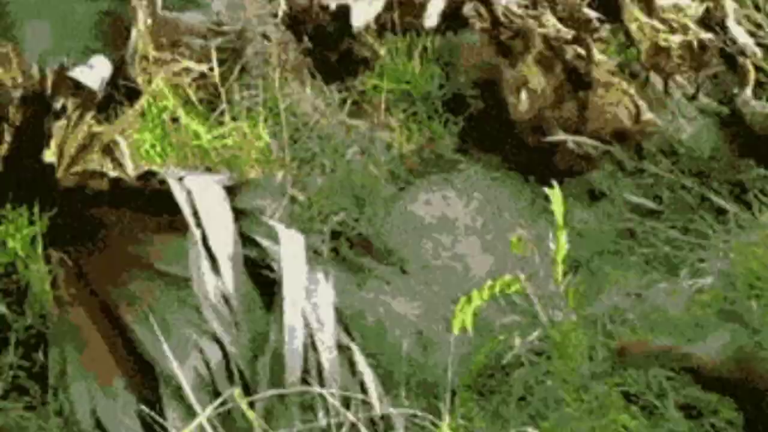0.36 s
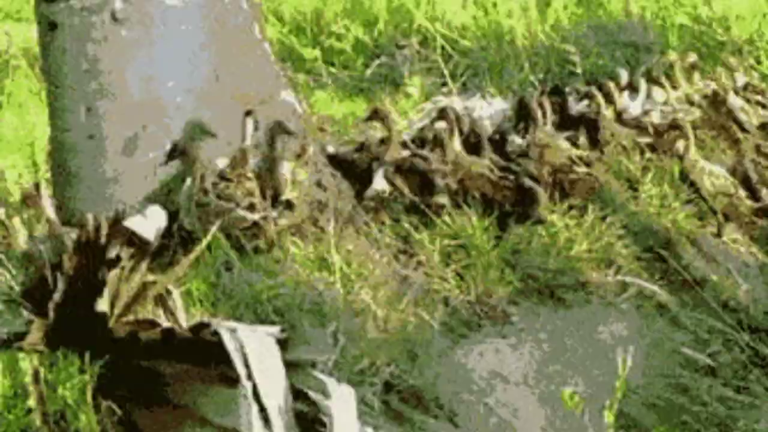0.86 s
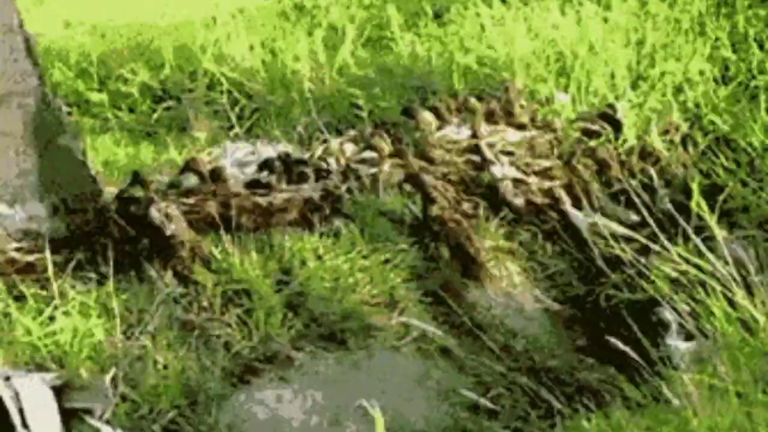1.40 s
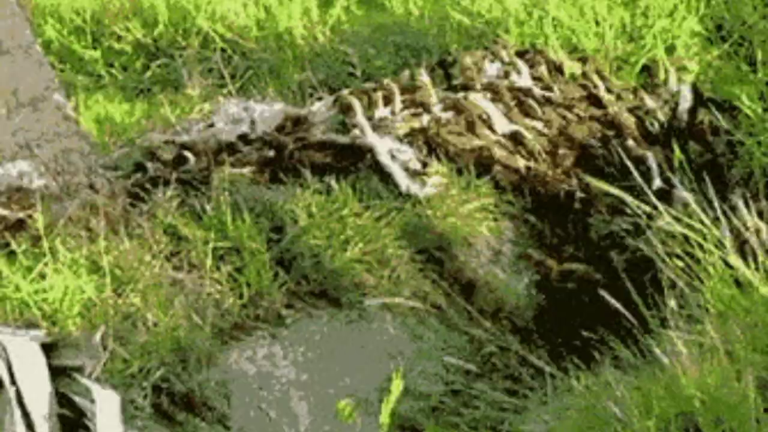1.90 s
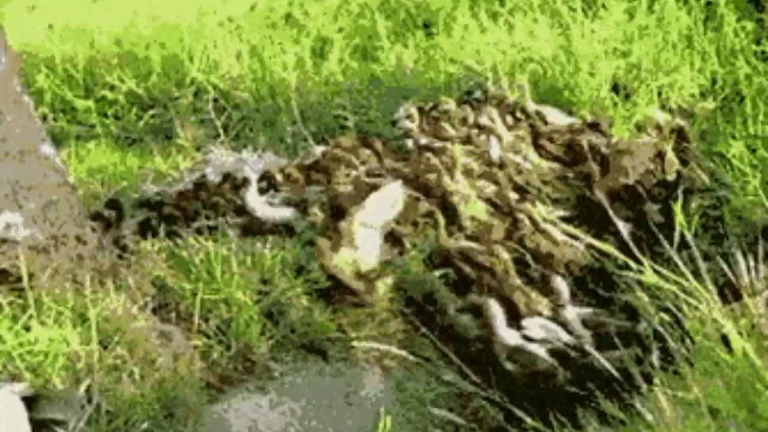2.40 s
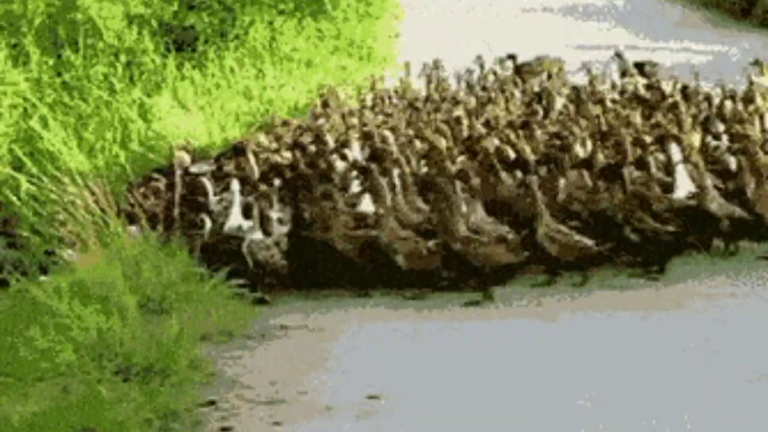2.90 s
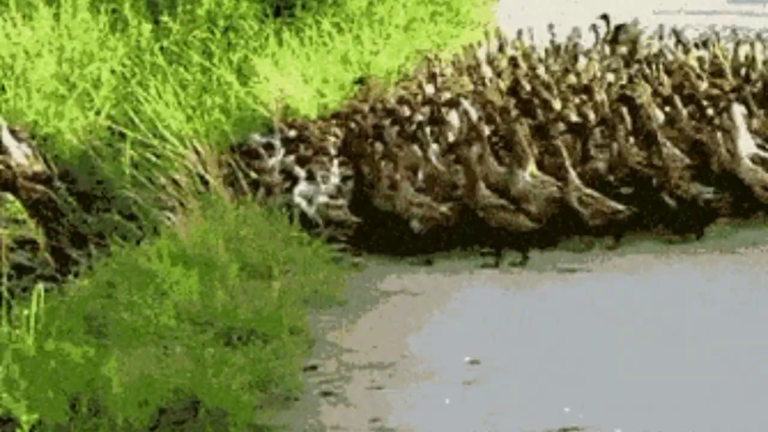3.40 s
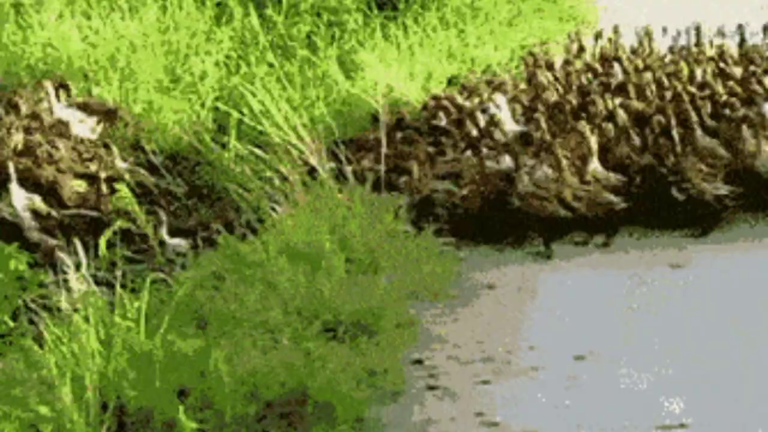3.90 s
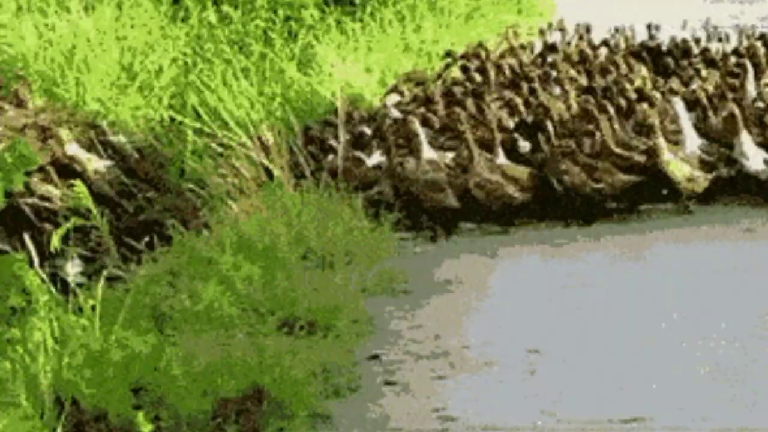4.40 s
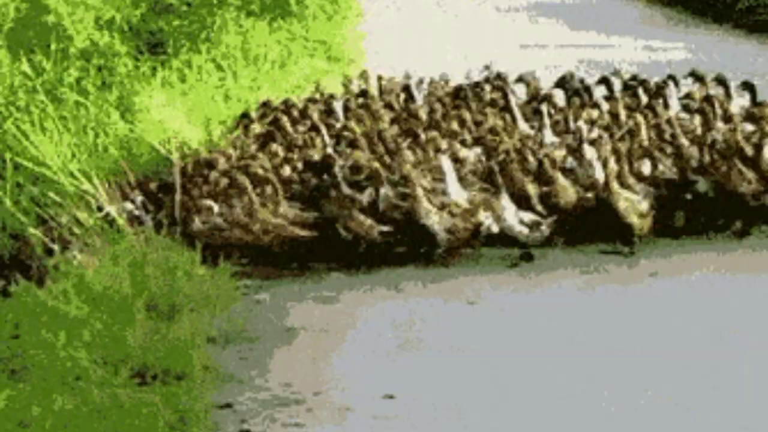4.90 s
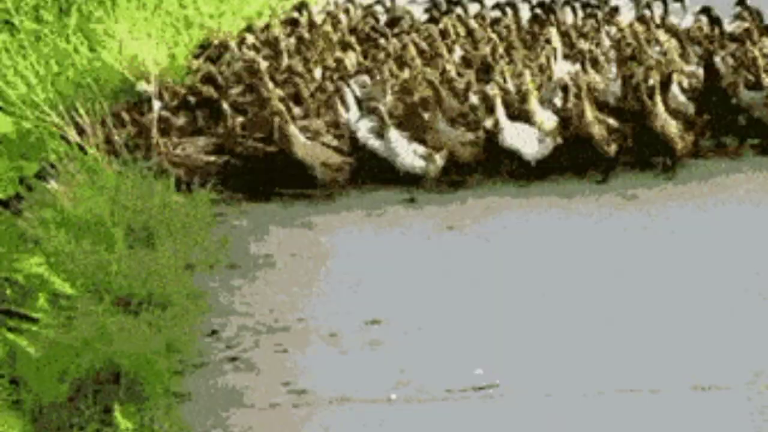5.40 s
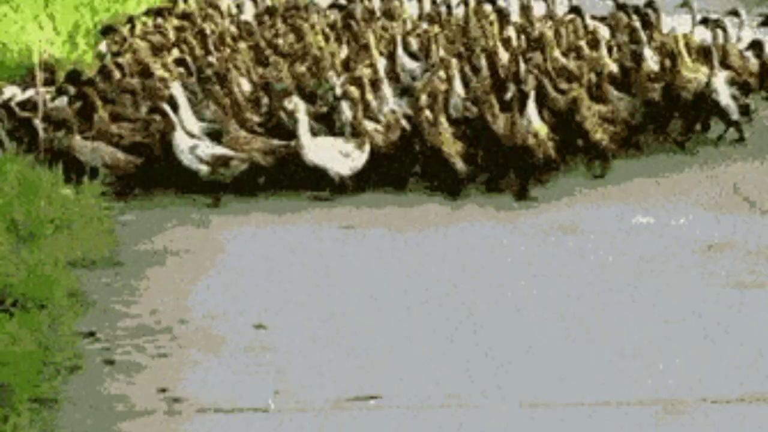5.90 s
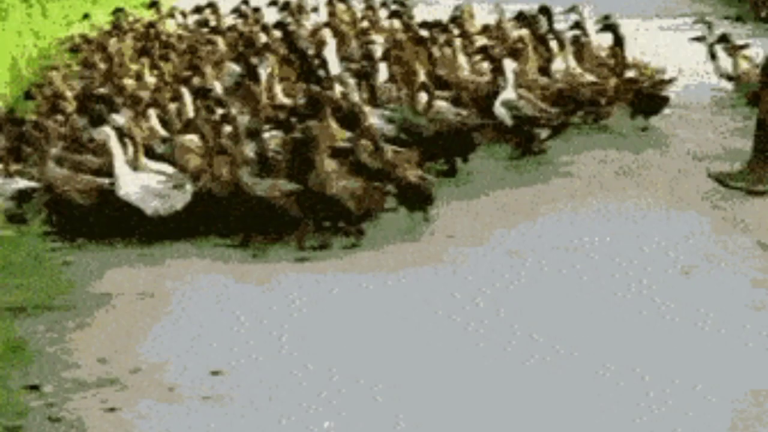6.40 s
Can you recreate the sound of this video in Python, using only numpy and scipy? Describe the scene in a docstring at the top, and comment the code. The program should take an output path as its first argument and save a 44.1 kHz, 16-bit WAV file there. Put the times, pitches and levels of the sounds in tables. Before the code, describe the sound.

Nasal hen quacks and short creaking clucks come ever closer together, with raspy drakes, small snaps and thin peeps in a quiet field.

```python
"""A duck quacks at once, close by on a grassy roadside, over a quiet field hum.
Hens quack with nasal, buzzing pulses that ring bill and windpipe, and end on short, creaking clucks.
Drakes rasp in between with throbbing, hoarse air; bills snap shut with small knocks, and thin tones peep.
A rustle of shaped noise hisses now and then; a short burst of mostly low, rumbling noise comes at the end."""
import sys
import numpy as np
from scipy import signal
from scipy.fft import rfft, irfft
from scipy.io import wavfile
from scipy.ndimage import uniform_filter1d

SR = 44100
rng = np.random.default_rng(int(sys.argv[2]) if len(sys.argv) > 2 else 0)


def volts_from_decibels(level):
    """Turn decibel levels (scalar or array-like) into linear amplitude factors."""
    exponent = np.asarray(level, float) / 20
    return 10 ** exponent


def dump(signal):
    """Clip the signal to [-1, 1] and save it as 16-bit WAV at the path in sys.argv[1]."""
    limited = np.clip(np.atleast_2d(signal).T, -1, 1)
    pcm = np.round(limited * 32767).astype(np.int16)
    wavfile.write(sys.argv[1], SR, pcm)


N = 287532  # length of the scene in samples

# Hen's windpipe and upper throat. Each row: resonance in Hz, width setting in Hz, gain in dB.
# A quack sets its own gain for the first row.
HEN_TUBE = [(667, 423, -19.5), (2062, 178, -10.5)]
# Treble resonances of a hen's voice. Each row: resonance in Hz, width setting in Hz, gain in dB.
HEN_TREBLE = [(3534, 1050, 2.5), (4660, 1400, -3.5), (6680, 1910, -13)]


def evened(x):
    """Scales to an average (rms) level of 1."""
    return x / np.sqrt(np.mean(x ** 2) + 1e-20)


def steady(x, size=1300):
    """Evens out the slow level over size samples, so that effort alone shapes the call."""
    return x / np.sqrt(uniform_filter1d(x ** 2, size) + 1e-12)


def wobble(n, size):
    """Smooth random drift of rms 1; a larger size in samples drifts more slowly."""
    smooth = uniform_filter1d(rng.standard_normal(n), size)
    return evened(uniform_filter1d(smooth, size))


def noise(colour, n):
    """Noise of rms 1 whose spectrum follows the colour table."""
    table_hz, table_db = np.transpose(colour)
    hz = np.fft.rfftfreq(n, 1 / SR)
    shape = volts_from_decibels(np.interp(np.log(hz + 1), np.log(table_hz), table_db))
    return evened(irfft(rfft(rng.standard_normal(n)) * shape, n))


def add(mix, s, sound):
    """Mixes a sound in from s seconds on."""
    part = mix[round(s * SR):][:len(sound)]
    part += sound[:len(part)]


def spread(rows):
    """Gives the start time and the columns of a curve, sample by sample."""
    s, *columns = np.transpose(rows)
    t = np.arange(s[0], s[-1], 1 / SR)
    return s[0], [np.interp(t, s, column) for column in columns]


def resonate(x, hz, width):
    """A steep resonance: shifts the curve hz down to zero, smooths twice, and shifts back."""
    turn = np.exp(2j * np.pi * np.cumsum(hz * np.ones(len(x))) / SR)
    r = np.exp(-np.pi * width / SR)
    once = signal.lfilter([1 - r], [1, -r], x / turn + 1e-18)
    twice = signal.lfilter([1 - r], [1, -r], once)
    return 2 * (turn * twice).real


def body(x, modes):
    """Sums fixed resonances, every other one upside down."""
    return sum((-1) ** k * volts_from_decibels(db) * resonate(x, hz, width) for k, (hz, width, db) in enumerate(modes))


def ground(x, t60):
    """Short scatter off grass, road and birds: sparse echoes of random sign, down 60 dB after t60 s."""
    at = np.arange(120, 9000, 22)
    taps = np.zeros(9100)
    signs = rng.choice([-1., 1.], len(at))
    taps[at + rng.integers(0, 22, len(at))] = signs * volts_from_decibels(-60 * at / SR / t60)
    return signal.fftconvolve(x, taps / np.linalg.norm(taps))[:N]


def hiss():
    """Microphone hiss: steady noise."""
    # The tint of the hiss. Each row: frequency in Hz, relative level in dB per Hz.
    hiss_colour = [(2000, -18.5), (5000, -3.5), (8400, 2), (12000, -4.5), (15500, -6.5)]
    return volts_from_decibels(-92.5) * noise(hiss_colour, N)


def field():
    """Low outdoor hum, made of noise, that swells with the stir of the flock."""
    # The tint of the hum. Each row: frequency in Hz, relative level in dB per Hz.
    field_colour = [(12, -20.5), (20, -18), (122, 1.5), (170, -6.5), (361, -10.5), (1230, -17),
                    (5220, -26.5), (8150, -38.5), (15400, -69)]
    # How the hum swells. Each row: time in seconds, change of level in dB.
    field_swell = [(0, 4), (2.798, 4), (3.2, 12.5), (4.399, 7), (5.8, 11), (6.25, -1.5), (6.32, -6),
                   (6.52, -15.5)]
    s, swell_db = np.transpose(field_swell)
    level_db = -79 + np.interp(np.arange(N) / SR, s, swell_db) + 1.5 * wobble(N, size=900)
    return volts_from_decibels(level_db) * noise(field_colour, N)


def burst(rows, colour):
    """Coloured noise on a level curve, with a light flicker."""
    s, (db,) = spread(rows)
    n = len(db)
    level = volts_from_decibels(db + 0.76 * wobble(n, size=150))
    return s, level * noise(colour, n) * signal.windows.tukey(n, .1)


def add_end_rumble(mix):
    """A short burst of mostly low, rumbling noise at the end."""
    # The course of the rumble. Each row: time in seconds, level in dB.
    rumble_curve = [(6.425, -59), (6.455, -47), (6.52, -58.5)]
    # The tint of the rumble. Each row: frequency in Hz, relative level in dB per Hz.
    rumble_colour = [(12, -27), (20, 6), (393, -22), (685, -16.5), (1410, -22), (1720, -11), (3740, -31.5),
                     (5830, -32.5), (13800, -44.5), (15400, -59.5)]
    add(mix, *burst(rumble_curve, rumble_colour))


def add_rustles(mix):
    """Rustles: bursts of hissing noise that rise and fall."""
    # The rustles. Each row: start in seconds, rise in seconds, fall in seconds, top level in dB.
    rustle_rows = [(0.25, 0.046, .11, -57), (0.63, 0.057, 0.093, -80.5), (3.24, .032, 0.18, -55),
                   (5.72, .11, .07, -70)]
    # The tint of a rustle. Each row: frequency in Hz, relative level in dB per Hz.
    rustle_colour = [(2350, -29.5), (4000, -2.5), (8200, -2), (8780, 0.5), (9500, -18), (11800, 2.5),
                     (15400, 4)]
    for s, rise, fall, db in rustle_rows:
        rest_db = db - 26.5
        curve = [(s, rest_db), (s + rise, db), (s + rise + fall, rest_db)]
        add(mix, *burst(curve, rustle_colour))


def snap(s, level_db, ring_hz, thump_db):
    """A blunt ringing knock with a thin noise crack, a short scuffle after it and a low push."""
    t = np.arange(1500) / SR
    knock = np.sin(2 * np.pi * ring_hz * t) * np.exp(-t / 0.0019)
    crack_and_scuffle = 0.19 * np.exp(-t / 0.0027) + 0.048 * np.exp(-t / 0.014)
    crack = rng.standard_normal(1500) * crack_and_scuffle
    crack = signal.lfilter(*signal.butter(3, 4500, fs=SR), crack)
    thump = 3 * volts_from_decibels(thump_db) * (1 - np.exp(-t / 0.0002)) * np.exp(-t / 0.0032)
    return s, volts_from_decibels(level_db) * (knock + crack) + thump


def add_snaps(mix):
    """Bill snaps and foot slaps, each a short knock."""
    # The knocks. Each row: start in seconds, level of knock and crack in dB, ring in Hz,
    # thump setting in dB (before it is tripled).
    snap_rows = [(0.645, -48, 670, -73), (0.652, -37, 563, -72), (1.488, -60, 857, -72),
                 (1.698, -55, 990, -70), (1.758, -38, 1114, -75), (2.324, -34, 872, -58),
                 (2.485, -49, 397, -82.5), (2.856, -36.5, 950, -75.5), (3.317, -39.5, 1044, -67.5),
                 (3.625, -42.5, 314, -78), (3.986, -42, 1110, -65), (4.284, -35, 520, -62.5),
                 (4.363, -41, 828, -61.5), (5.072, -66.5, 1074, -74), (5.371, -33, 910, -73),
                 (5.855, -35.5, 605, -65), (6.137, -31.5, 1220, -72), (6.339, -71, 857, -79.5)]
    for row in snap_rows:
        add(mix, *snap(*row))


def whistle(s, length, from_hz, to_hz, from_db, to_db):
    """A thin gliding tone that flutters a little."""
    n = round(length * SR)
    hz, db = np.linspace([from_hz, from_db], [to_hz, to_db], n).T
    angle = 2 * np.pi * np.cumsum(hz * (1 + 0.0036 * wobble(n, size=100))) / SR
    return s, volts_from_decibels(db) * np.sqrt(2) * np.sin(angle) * signal.windows.tukey(n, .3)


def add_whistles(mix):
    """Thin peeps, most leading into or out of a quack."""
    # The peeps. Each row: start in seconds, length in seconds, first pitch in Hz, last pitch in Hz,
    # first level in dB, last level in dB.
    whistle_rows = [(0.0, 0.029, 1493, 1380, -47, -50), (0.287, 0.057, 1235, 1330, -63, -60.5),
                    (0.73, 0.036, 804, 804, -54.5, -40), (2.959, 0.054, 1276, 1380, -46.5, -40.5),
                    (2.968, 0.064, 880, 846, -49, -46), (3.266, 0.075, 1490, 1507, -65.5, -58),
                    (3.675, 0.03, 1630, 1510, -36, -61.5), (4.634, .035, 857, 820, -48.5, -30),
                    (5.719, 0.069, 1380, 1307, -49, -80), (5.902, .03, 1544, 1705, -37, -36.5),
                    (5.926, 0.037, 912, 940, -31.5, -37)]
    for row in whistle_rows:
        add(mix, *whistle(*row))


def rasp_effort(first_db, swell, top_db, hold):
    """Effort of a rasp in dB: swell, hold, even fade."""
    tail_s, fade_db_per_s = .085, 519.5
    ends = np.cumsum([0, swell, hold, tail_s])
    levels = [first_db, top_db, top_db, top_db - fade_db_per_s * tail_s]
    return np.interp(np.arange(0, ends[-1], 1 / SR), ends, levels)


def rasp(s, first_db, swell, top_db, hold, rate, bright_db, depth):
    """Hoarse air in slow throbs; within each throb the ring climbs and the treble comes last."""
    # drake's treble resonances. Each row: resonance in Hz, width setting in Hz, gain in dB.
    drake_treble = [(2270, 400, 5), (2950, 1800, 7.5), (4620, 970, 6.5), (5550, 930, -7)]
    effort_db = rasp_effort(first_db, swell, top_db, hold)
    n, depth = len(effort_db), np.clip(depth, 0, 1)
    # the bill opens with effort by 26.6 Hz per dB; its starting ring is held to at least 1380 Hz,
    # before the sinking and throbbing
    bill_hz = np.maximum(1697 + 26.6 * (effort_db + 41), 1380)
    bill_hz *= 1 - 0.53 * np.arange(n) / SR  # then the ring sinks through the rasp
    phase = (np.cumsum(rate * (1 + 0.067 * wobble(n, size=400))) / SR) % 1
    throb = 1 - depth + depth * np.exp(-((phase - .45) / .2) ** 2)
    late_throb = 1 - depth + depth * np.exp(-((phase - .57) / .15) ** 2)
    breath = rng.standard_normal(n)
    climb_hz = bill_hz * (1 + 0.19 * np.sin(2 * np.pi * (phase - .45)))
    ring = throb * (resonate(breath, climb_hz, 360) + 0.16 * resonate(breath, 1290, 180))
    dulled_db = bright_db + 0.98 * (effort_db - effort_db.max())  # softer is duller
    treble = volts_from_decibels(dulled_db) * steady(late_throb * body(breath, drake_treble))
    return s, volts_from_decibels(effort_db) * (steady(ring) + treble) * signal.windows.tukey(n, .05)


def add_rasps(mix):
    """Drakes rasp hoarsely, one row of each table a rasp."""
    # The course of each rasp. Each row: start in seconds, first breath in dB, swell in seconds,
    # top effort in dB, hold in seconds.
    rasp_rows = [(0.412, -44, 0.051, -38, 0.014), (1.1, -51, 0.044, -37, 0.037),
                 (1.759, -59.5, 0.039, -43.5, .04), (2.067, -47, 0.028, -44, 0.026),
                 (2.324, -51, 0.017, -42.5, 0.039), (2.528, -49, 0.063, -39.5, 0.011),
                 (2.857, -49, 0.034, -44, 0.021), (3.91, -51, 0.031, -40, 0.022),
                 (4.361, -74.5, .22, -51.5, .05), (4.928, -43, .02, -44, 0.058),
                 (5.362, -43.5, 0.022, -43.5, 0.06), (6.134, -49.5, 0.055, -45, 0.018)]
    # The voice of each rasp. Each row: throbs per second, brightness at full effort in dB,
    # depth of the throb from 0 to 1.
    drake_voices = [(73.2, -12, 0.7), (78.1, -11, 0.69), (65.1, -20, 0.6), (66.2, -21, 0.7),
                    (69.2, -13, 0.59), (70.2, -12.5, 0.68), (71.9, -25.5, 0.3), (73.4, -23.5, 0.5),
                    (60.03, -30.5, 0), (64.8, -19.5, 0.72), (72.6, -15.5, 0.75), (64.8, -18, 0.7)]
    for row, drake in zip(rasp_rows, drake_voices):
        add(mix, *rasp(*row, *drake))


def cluck_effort(peak_db, rise, drop_db, fade):
    """Effort of a cluck in dB: a short rise, a sudden drop, then an even fade."""
    rise_db, drop_s, tail_s = 15.5, 0.0079, 0.078
    t = np.arange(-rise, tail_s, 1 / SR)
    after = np.maximum(t, 0)
    rising_db = peak_db + rise_db * np.minimum(t, 0) / rise
    return rising_db - abs(drop_db) * (1 - np.exp(-after / drop_s)) - abs(fade) * after


def cluck(s, peak_db, rise, drop_db, fade, bill_hz):
    """A few slow, uneven pulses as the voice creaks shut; one falls at full effort."""
    effort_db = cluck_effort(peak_db, rise, drop_db, fade)
    n = len(effort_db)
    chest_db = -42.5 - 0.67 * effort_db  # a weak voice has a greater share of chest
    turns = np.cumsum(155 * (1 + .15 * wobble(n, size=200))) / SR  # about 155 pulses per second
    turns += 20 - turns[np.argmax(effort_db)]  # lines a pulse up with the loudest moment
    whole_turns = np.floor(turns)
    strength = volts_from_decibels(5.2 * rng.standard_normal(60)[turns.astype(int)])
    pulses = abs(np.diff(whole_turns, prepend=whole_turns[0])) * strength
    breath = rng.standard_normal(n)
    blunt = signal.lfilter(*signal.butter(2, 2600, fs=SR), evened(pulses) + .4 * breath)
    drive = evened(blunt)
    sinking_hz = bill_hz * (1 - 1.1 * np.arange(n) / SR)  # the ring sinks as the bill closes
    voice = resonate(drive, sinking_hz, 480) - body(drive, HEN_TUBE)
    treble_db = -23 + 0.13 * (effort_db - effort_db.max())
    treble = volts_from_decibels(treble_db) * steady(body(0.23 * drive + breath, HEN_TREBLE), size=700)
    chest = volts_from_decibels(chest_db) * steady(resonate(drive, 230, 150), size=700)
    sound = volts_from_decibels(effort_db) * (steady(voice, size=700) + treble + chest)
    return s - rise, sound * signal.windows.tukey(n, .1)


def add_clucks(mix):
    """Short clucks of the hens."""
    # The clucks. Each row: loudest moment in seconds, peak effort in dB, rise in seconds,
    # first drop in dB (sign ignored), fade in dB per second, bill resonance at the start in Hz.
    cluck_rows = [(0.24, -29, 0.034, 1, 443, 1420), (0.36, -35, 0.015, 4.5, 379, 1270),
                  (0.679, -45.5, 0.0083, 13, 62.5, 1136), (1.018, -31.5, 0.019, -3, 525, 1350),
                  (1.7, -49, 0.0052, 4, 530, 1100), (2.038, -28, .03, 9, 350.5, 1320),
                  (3.189, -33, 0.023, 3, 479, 1140), (3.241, -42.5, 0.0076, 8, 252, 1170),
                  (3.499, -24.5, 0.037, 0.5, 440, 1460), (3.629, -52.5, 0.011, 1, 60, 1266),
                  (3.858, -34.5, 0.021, 7.5, 527, 1320), (4.209, -28.5, .02, 6, 620, 1356),
                  (4.288, -55, .008, 14, 162, 1170), (4.597, -48.5, .015, -3, 596, 1300),
                  (4.898, -24.5, .025, 15.5, 218, 1383), (5.076, -47.5, 0.0046, 14.5, 80.5, 1180),
                  (5.323, -34.5, .04, 20, 300, 1170), (5.446, -43.5, 0.013, 11.5, 119, 1330),
                  (5.708, -21, 0.019, 17, 402, 1303), (5.859, -44.5, 0.0089, 5, 383, 1410),
                  (6.094, -21.5, 0.016, 11.5, 634, 1350)]
    for row in cluck_rows:
        add(mix, *cluck(*row))


def chest_tone(effort_db, peak_db):
    """Level of the chest tone in dB: steep on the way in, slow on the way out."""
    loudest = np.argmax(effort_db)
    k = np.arange(len(effort_db)) - loudest
    slope = np.where(k < 0, 1.8, 0.32)  # dB per dB of effort: it enters late and lingers
    return peak_db + slope * (effort_db - effort_db.max()) + 27.5 * k / SR  # grows 27.5 dB per s


def quack(rows, rough, uneven, bright_db, sizzle_db, pipe_db, chest_db, bill_hz):
    """Buzzing pulses, every other one weaker if uneven, ring windpipe and bill over a pure chest tone."""
    s, (effort_db, pitch_hz) = spread(rows)
    n = len(pitch_hz)
    weakness_db = effort_db.max() - effort_db
    chest_db = chest_tone(effort_db, chest_db)
    bill_hz = bill_hz + 7.1 * weakness_db  # the bill rings higher when the voice is weak
    rough = np.clip(rough + .025 * weakness_db, 0, .85)  # a weak voice turns hoarse
    turns = np.cumsum(pitch_hz * (1 + 0.0062 * wobble(n, size=300))) / SR
    pulses = evened(sum(np.cos(2 * np.pi * k * turns) for k in range(2, 34)))
    # each pulse has its own strength
    cycle_db = np.clip(rng.standard_normal(90), -2, 1)[np.round(turns).astype(int)]
    strong_weak = 1 + np.clip(uneven, 0, 1) * np.cos(np.pi * turns)
    swing = strong_weak * volts_from_decibels(9 * np.minimum(rough, .3) * cycle_db)
    puffs = evened((.3 + np.exp(-(turns % 1) / .35)) * swing * rng.standard_normal(n))
    drive = (1 - rough) * pulses * swing + 1.6 * rough * puffs

    (pipe_hz, pipe_width, _), throat = HEN_TUBE
    pipe = resonate((1 - rough) * pulses + .8 * rough * puffs, pipe_hz, pipe_width)
    voice = resonate(drive, bill_hz, 460) - volts_from_decibels(pipe_db) * pipe
    voice += body(0.6 * drive + .5 * puffs, [throat])
    voice = signal.lfilter(*signal.butter(2, 3500, fs=SR), voice)  # flesh damps the edge of each pulse
    treble = steady(body(.35 * (1 - rough) * pulses * swing + puffs, HEN_TREBLE))
    treble += volts_from_decibels(sizzle_db) * steady(resonate(puffs, 9000, 3300))
    treble_db = bright_db - 0.064 * weakness_db
    sound = volts_from_decibels(effort_db) * (steady(voice) + volts_from_decibels(treble_db) * treble)
    chest_db = np.minimum(chest_db, effort_db - 3)  # never above the voice
    sound += volts_from_decibels(chest_db) * np.sqrt(2) * np.sin(2 * np.pi * turns)
    return s, sound * signal.windows.tukey(n, .06)


def add_quacks(mix):
    """Hens quack, one entry of each table a quack."""
    # The course of each quack, one small table each. Each row: time in seconds, effort in dB, pitch in Hz.
    quack_curves = [
        [(0, -47.5, 194.6), (0.04, -37, 219.5), (0.065, -27.5, 216.2), (0.16, -22, 226.2), (0.2, -35, 230.8),
         (0.23, -32, 236)],
        [(0.72, -67, 180.5), (0.765, -35, 200), (0.795, -28.5, 201.3), (0.875, -24.5, 204.8),
         (0.92, -30.5, 219.4), (0.955, -37.5, 224.6), (1, -47, 224.6)],
        [(1.84, -34.5, 211.6), (1.858, -28, 209), (1.93, -26, 209.2), (1.99, -26.5, 213.3), (2.015, -31, 214.5),
         (2.03, -25.5, 221)],
        [(2.96, -50, 200.6), (3.03, -41.5, 215.2), (3.05, -28, 221.3), (3.095, -27.5, 209),
         (3.125, -33.5, 228.3), (3.17, -49.5, 266)],
        [(3.33, -53, 262.7), (3.35, -35.5, 277.3), (3.378, -24, 273.3), (3.44, -24.5, 281.3),
         (3.475, -31.5, 296)],
        [(3.67, -51.5, 241), (3.69, -35, 262.5), (3.715, -31.5, 251.7), (3.76, -26.5, 261.7), (3.775, -41, 253),
         (3.8, -51, 258), (3.83, -58, 254.8)],
        [(4.035, -45, 218.7), (4.07, -31, 215), (4.09, -25, 233), (4.145, -26.5, 243.1), (4.165, -37, 256.3),
         (4.2, -61, 240)],
        [(4.63, -53, 205.5), (4.66, -34, 203.6), (4.69, -21.5, 214.5), (4.8, -19.5, 221.5), (4.84, -23, 237),
         (4.865, -38.5, 231.4), (4.885, -35.5, 247.5)],
        [(5.115, -51.5, 224.1), (5.14, -29, 220.5), (5.162, -24, 230.5), (5.21, -25, 252.5), (5.23, -33, 243),
         (5.26, -37, 259), (5.29, -71, 265.2)],
        [(5.485, -52.5, 218.7), (5.51, -26, 234.4), (5.545, -22, 252.8), (5.6, -22.5, 259.1), (5.615, -27, 273),
         (5.635, -27, 269), (5.66, -42.5, 291), (5.69, -35.5, 256.5)],
        [(5.9, -44.5, 303.8), (5.915, -34, 314.9), (5.96, -29.5, 309.8), (5.975, -23.5, 249.1),
         (5.99, -21, 244.6), (6.03, -23.5, 251.4), (6.045, -35.5, 247.2), (6.08, -37.5, 258.6)],
    ]
    # The voice of each quack. Each row: roughness at full effort from 0 to 1, strong-weak swing
    # from 0 to 1, brightness at full effort in dB, top sizzle against the treble in dB,
    # windpipe gain in dB, chest tone at the loudest moment in dB (before its ceiling),
    # bill resonance at full effort in Hz.
    hen_voices = [(0.26, 0, -22.5, -26.5, -41.5, -43, 1255), (0.3, 0, -25.5, -34.5, -34.5, -55.5, 1275),
                  (0.35, 0, -27.5, -42, -25.5, -50.5, 1340), (0.41, 0, -22.5, -50, -33, -49, 1190),
                  (0.32, 0, -21, -61, -26, -40, 1366), (0.42, 0.05, -26, -41, -14.5, -36, 1330),
                  (0.33, 0.12, -18.5, -60, -25, -40.5, 1220), (0.34, 0.11, -21, -59, -33.5, -41, 1334),
                  (0.41, 0.1, -17, -46, -10, -40, 1325), (0.39, 0.03, -14, -23, -9.5, -35.5, 1346),
                  (0.35, 0, -16, -16.5, -14, -36, 1324)]
    for rows, hen in zip(quack_curves, hen_voices):
        add(mix, *quack(rows, *hen))


def scene():
    """All birds in the middle; the two ports differ a little in scatter, rustle, rumble, hum and hiss."""
    flock, air = np.zeros(N), np.zeros(N)
    add_end_rumble(air)
    add_rustles(air)
    add_whistles(flock)
    add_rasps(flock)
    add_clucks(flock)
    add_quacks(flock)
    no_extremes = signal.butter(4, [130, 10500], "band", fs=SR, output="sos")
    flock = signal.sosfilt(no_extremes, flock)  # no deep bass, no top
    add_snaps(flock)
    scatter = volts_from_decibels(-10) * ground(flock, t60=.1)
    mid = flock + scatter + air + field() + hiss()
    treble = signal.lfilter(*signal.butter(2, 3200, "high", fs=SR), flock)
    side = volts_from_decibels(-31.5) * ground(treble, t60=0.058)
    side += volts_from_decibels(-5.0) * ground(air, t60=.05)
    side += volts_from_decibels(-12.5) * field() + hiss()
    return np.array([mid + side, mid - side])


def low_pass(x):
    """Removes everything above the highest recorded frequency."""
    return signal.sosfilt(signal.butter(12, 15600, fs=SR, output="sos"), x)


def record(dry):
    """Hands on the finished mix."""
    return low_pass(dry)


dry = scene()
out = record(dry)
dump(out)
```